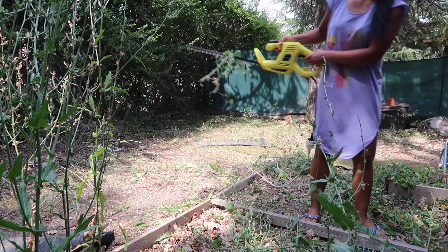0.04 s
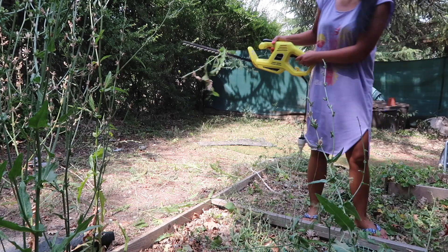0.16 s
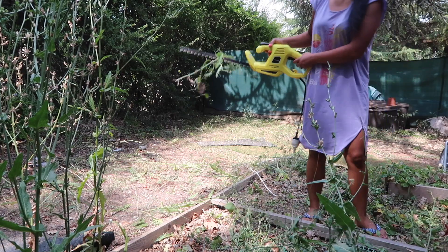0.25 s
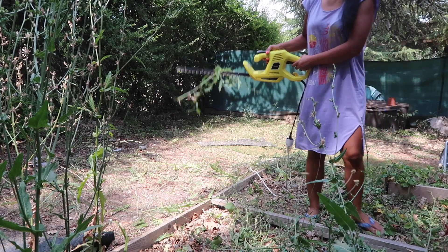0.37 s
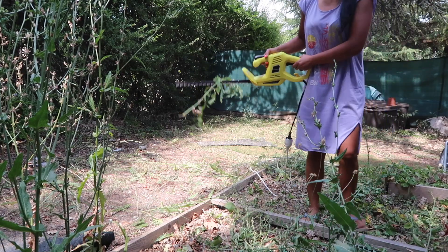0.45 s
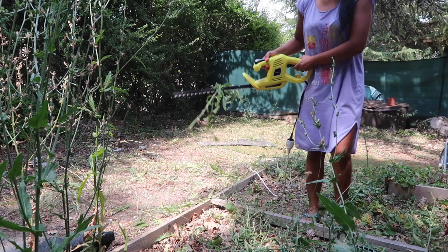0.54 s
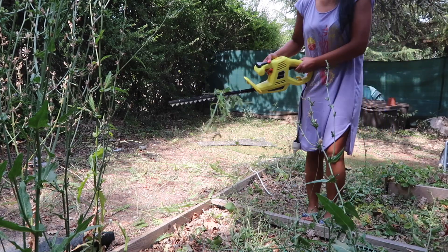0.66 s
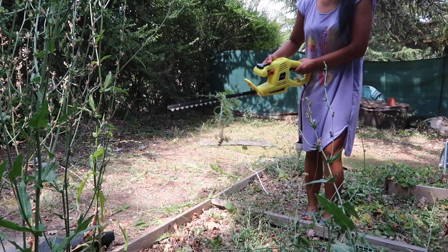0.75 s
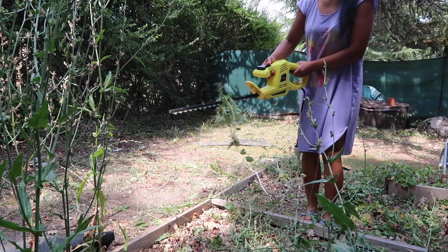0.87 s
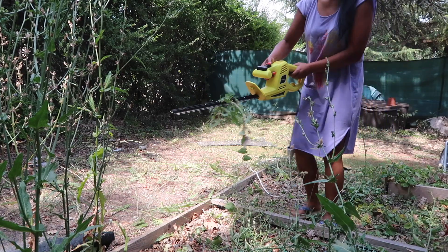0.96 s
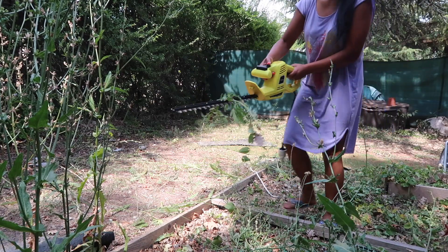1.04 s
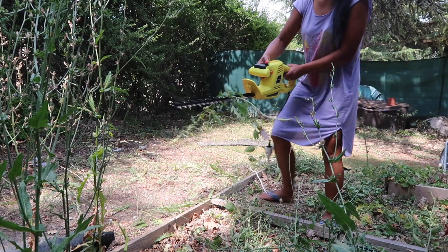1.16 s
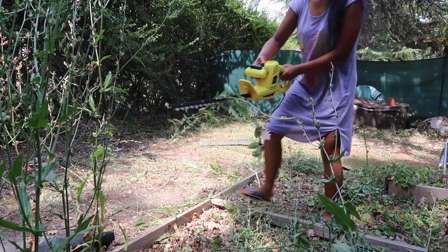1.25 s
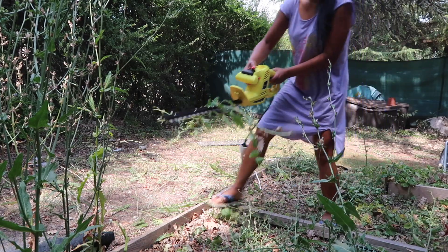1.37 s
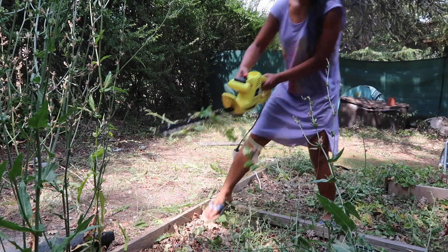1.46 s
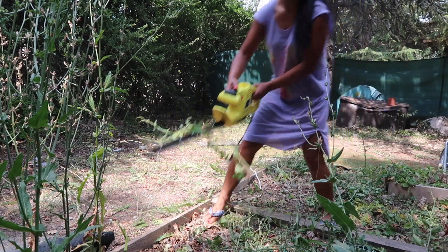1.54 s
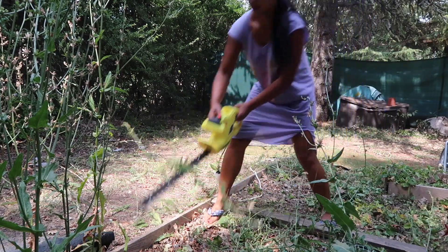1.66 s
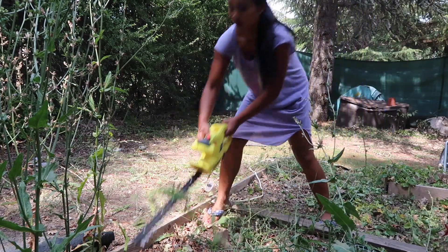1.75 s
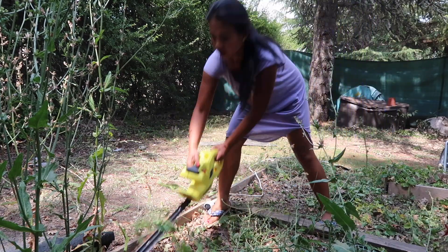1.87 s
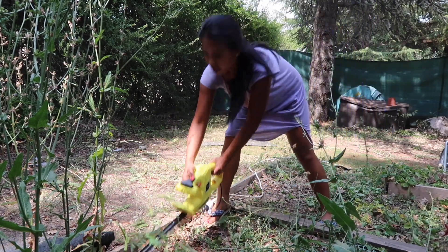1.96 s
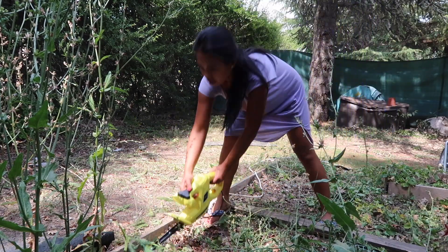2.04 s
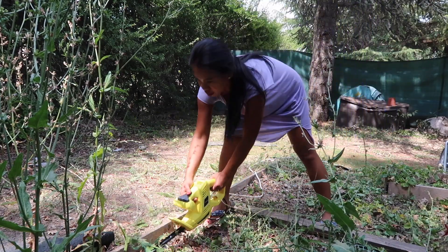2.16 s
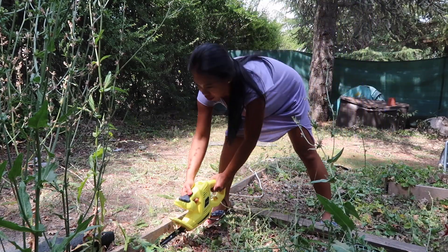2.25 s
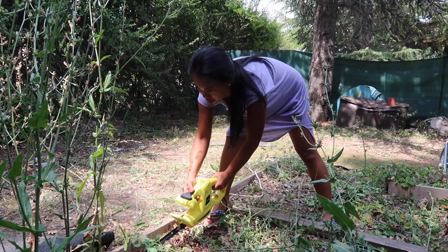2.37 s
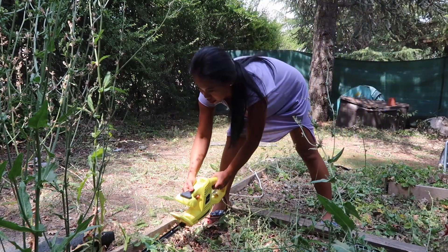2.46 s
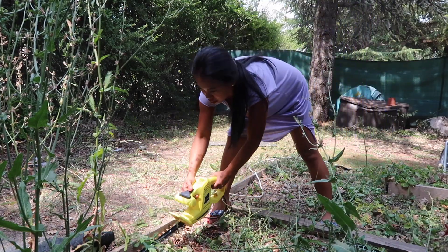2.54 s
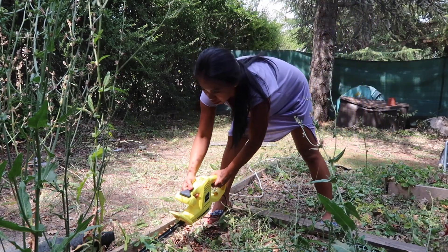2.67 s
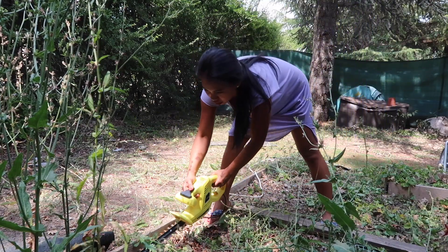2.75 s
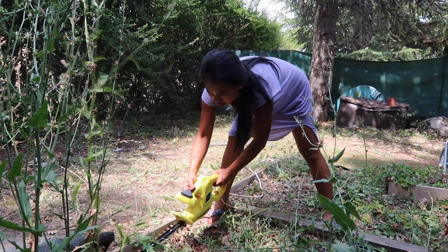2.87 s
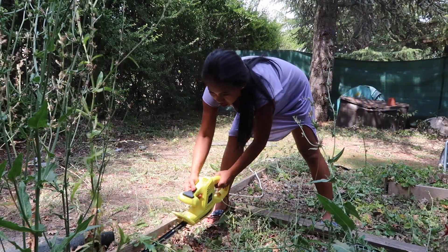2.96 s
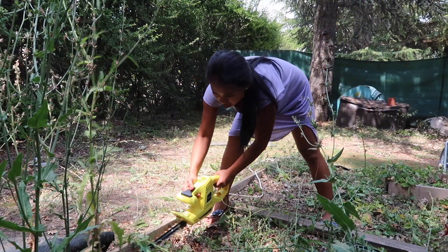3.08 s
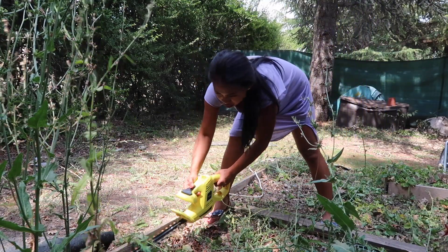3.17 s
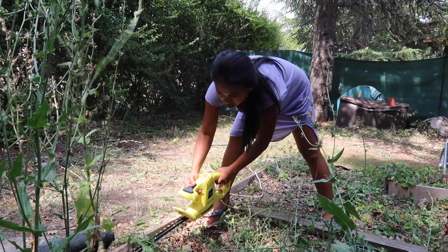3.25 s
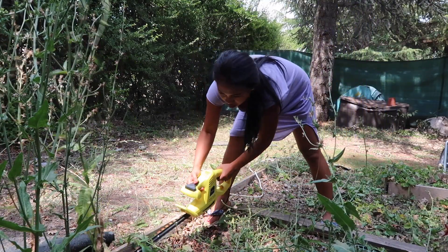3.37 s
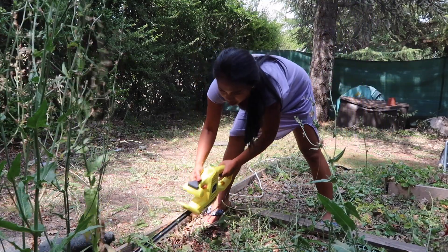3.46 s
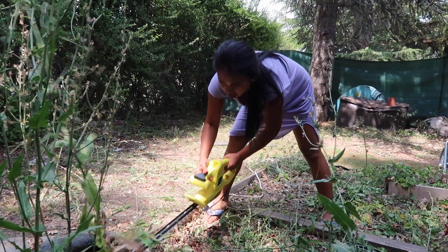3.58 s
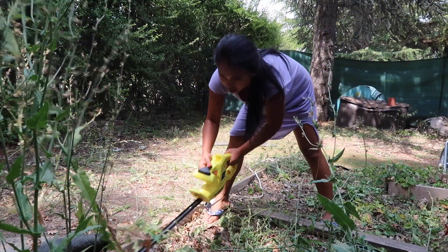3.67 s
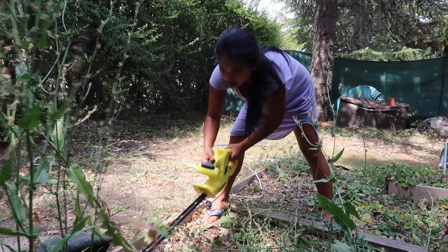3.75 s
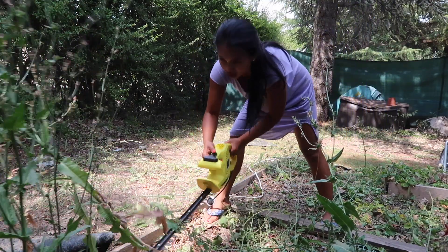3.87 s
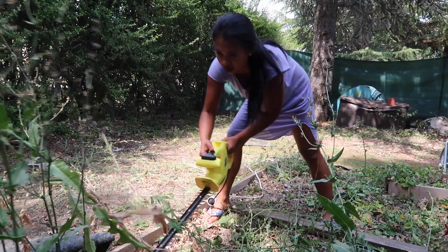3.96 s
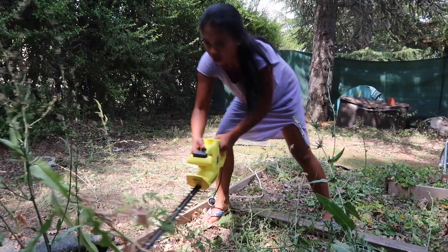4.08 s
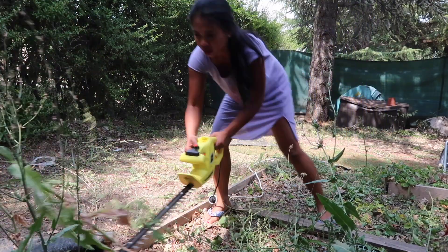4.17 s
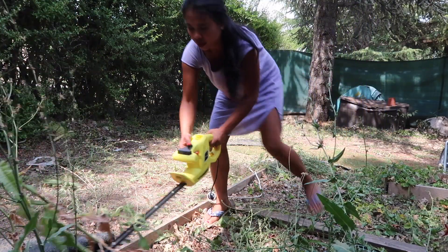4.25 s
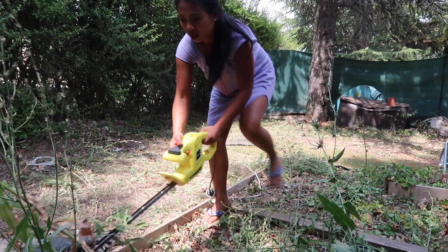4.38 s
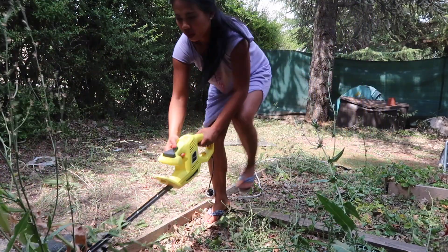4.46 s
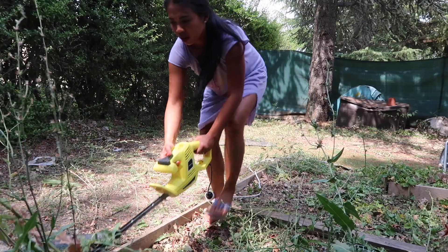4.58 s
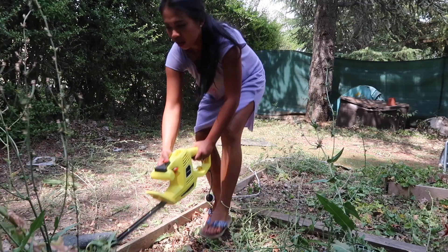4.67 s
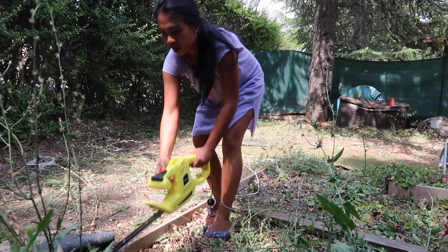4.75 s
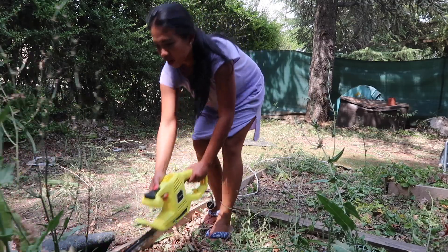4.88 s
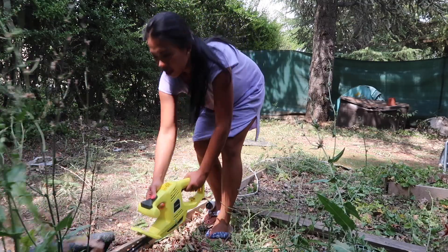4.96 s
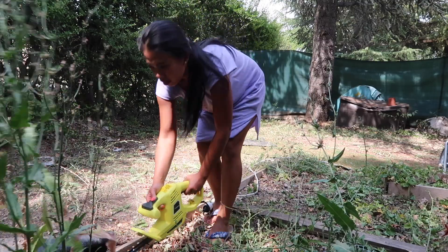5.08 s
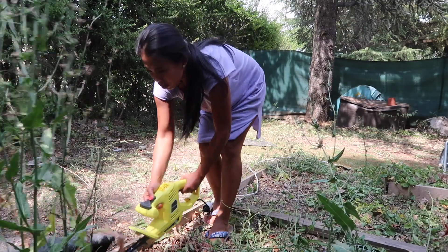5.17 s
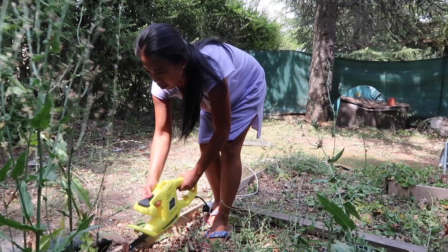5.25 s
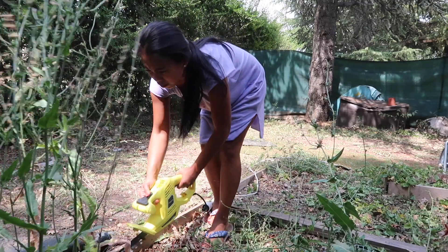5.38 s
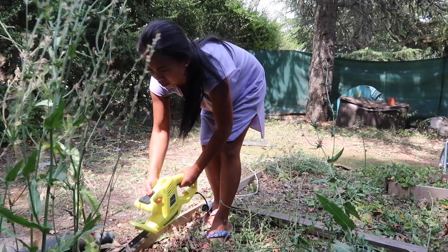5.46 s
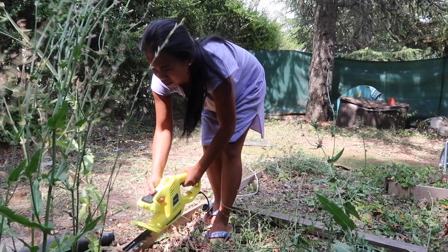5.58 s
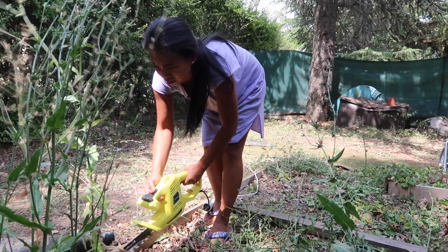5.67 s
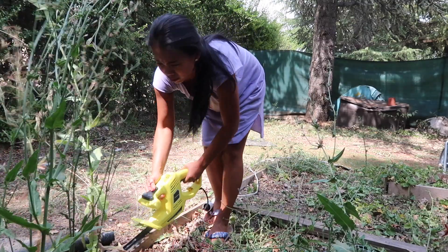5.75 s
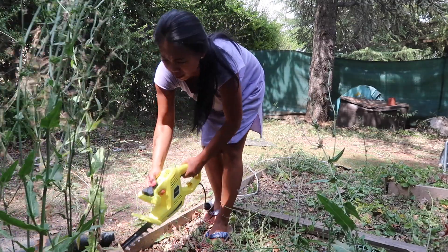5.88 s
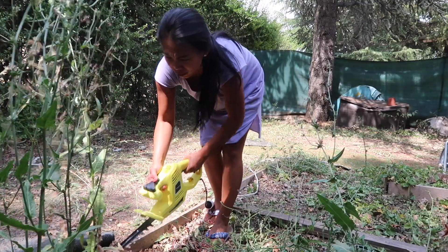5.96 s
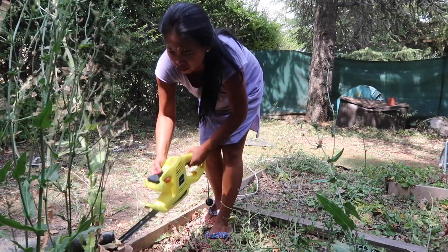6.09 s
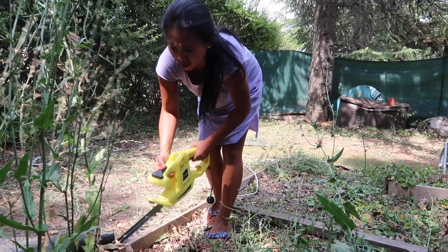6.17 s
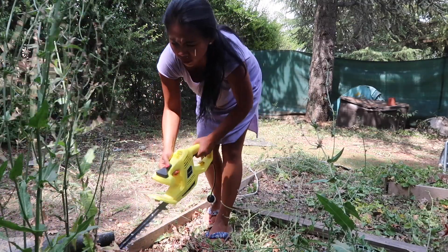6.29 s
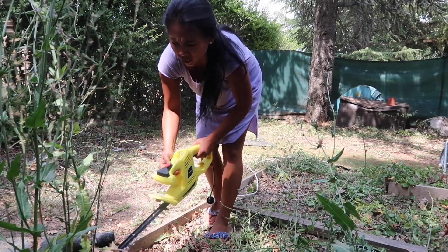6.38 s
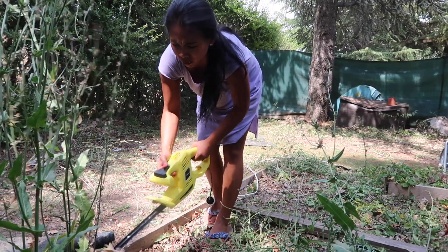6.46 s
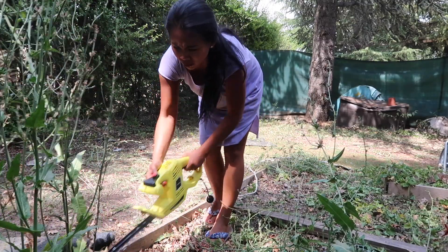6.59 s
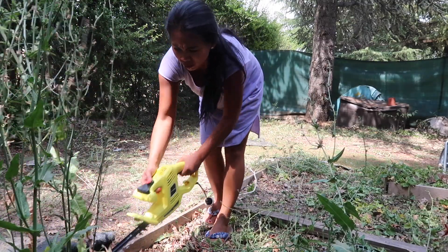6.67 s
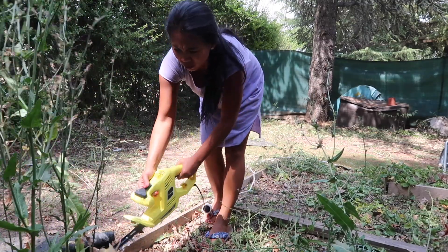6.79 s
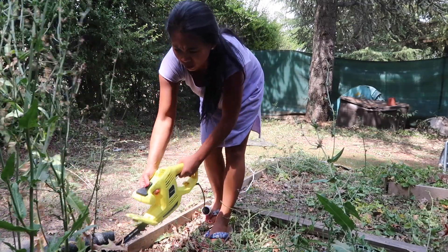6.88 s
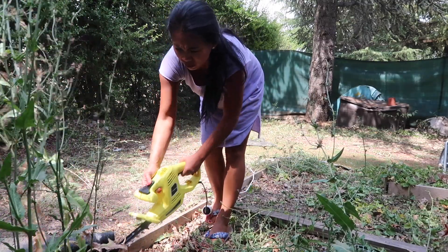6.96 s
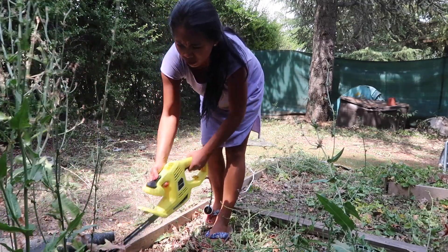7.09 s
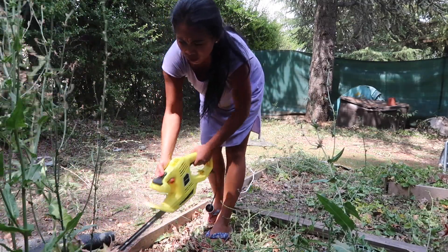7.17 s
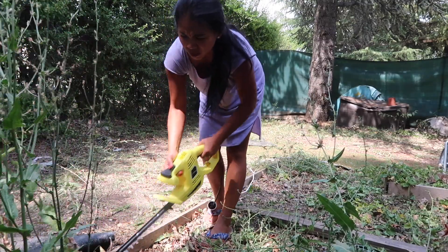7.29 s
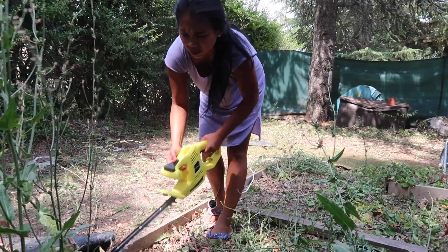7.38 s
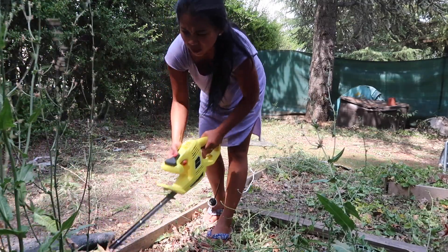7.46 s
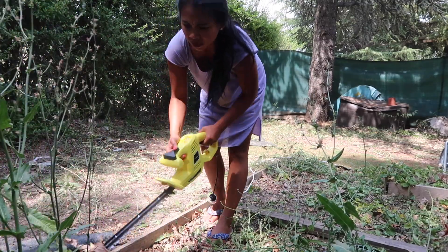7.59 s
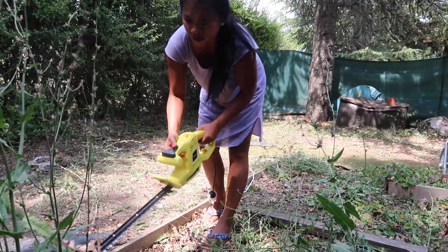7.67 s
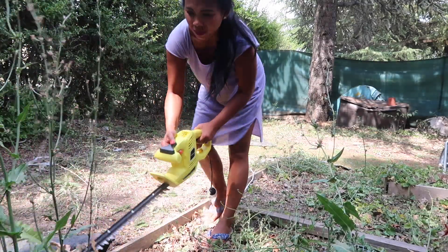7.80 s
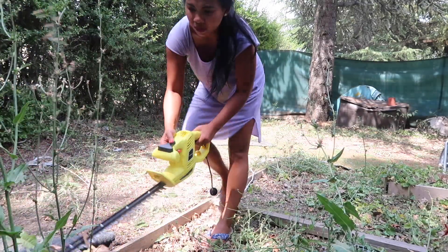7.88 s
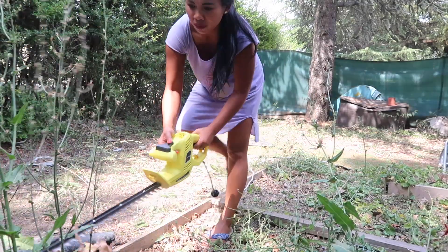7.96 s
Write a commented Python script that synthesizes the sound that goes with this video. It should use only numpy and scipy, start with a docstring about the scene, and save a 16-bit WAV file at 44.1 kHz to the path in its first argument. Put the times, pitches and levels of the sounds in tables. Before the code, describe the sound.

Close, dry pickup of an electric hedge trimmer used in short pulls: a tiny blip running into a first burst, then two more bursts well apart. Each starts with a clack, climbs into a metallic, grinding rattle with a motor whine, then slows into loose ticking. Between them are small stem snaps, leaf rustle and soft ground bumps, over a faint buzzing cicada, a few bird whistles, fading tyre noise and a low engine hum.

```python
"""A cicada chirps and a vehicle hums far off; soon dry weeds rustle and stems snap, heard close by.
Then a corded hedge trimmer bursts in, first with one brief pull of the trigger and then three longer ones.
Its rattle is knocks and scraping noise sent through resonances; its whine is tones that follow the motor's speed.
Rustles, snaps and single clacks are filtered clicks and noise, bumps are short low tones with soil noise,
bird whistles are gliding tones, and the vehicle is a hum with harmonics over low rumble and tyre noise."""
import sys
import numpy as np
from scipy import signal
from scipy.fft import rfft, irfft, next_fast_len
from scipy.io import wavfile
from scipy.ndimage import uniform_filter1d, map_coordinates

SR = 44100
rng = np.random.default_rng(int(sys.argv[2]) if len(sys.argv) > 2 else 0)


def generate_wav(signal):
    """Clip the signal to [-1, 1] and save it as 16-bit WAV at the path in sys.argv[1]."""
    frames = np.transpose(np.atleast_2d(signal))
    scaled = np.clip(frames, -1, 1) * 32767
    pcm = np.round(scaled).astype(np.int16)
    wavfile.write(sys.argv[1], SR, pcm)


N = 354123
T = np.arange(N) / SR  # time of every sample, s
TOP_HZ = 15800  # nothing sounds above this pitch


def amp(db):
    """Turn decibels into a gain."""
    return 10 ** (np.asarray(db) / 20)


def unit(x):
    """Scale a sound to rms 1."""
    return x / np.sqrt(np.mean(x ** 2) + 1e-20)


def along(points, hz):
    """Read a curve of (f/Hz, value) points, with pitch on a log axis."""
    f, v = np.transpose(points)
    return np.interp(np.log(hz + 1), np.log(f + 1), v)


def curves(rows):
    """Give one value per sample for each column after the time."""
    s, *cols = np.transpose(rows)
    return [np.interp(T, s, c) for c in cols]


def wobble(rate):
    """Draw a smooth random curve with rate knots a second."""
    knots = rng.standard_normal(int(N * rate / SR) + 4)
    return map_coordinates(knots, [T * rate])


def filtered(x, response):
    """Multiply the spectrum of x by a response, which may be complex."""
    m = next_fast_len(len(x) + 8192)
    return irfft(rfft(x, m) * response(np.fft.rfftfreq(m, 1 / SR)), m)[:len(x)]


def coloured(x, spectrum):
    """Give x a tone colour with a causal (minimum-phase) filter, so that nothing sounds early."""
    size = 4096
    cepstrum = irfft(np.log(amp(along(spectrum, np.fft.rfftfreq(size, 1 / SR)))))
    # folding the cepstrum onto positive times makes the filter causal
    cepstrum[1:size // 2] *= 2
    cepstrum[size // 2 + 1:] = 0
    return signal.fftconvolve(x, irfft(np.exp(rfft(cepstrum))))[:len(x)]


def resonances(modes, f):
    """Add up the responses of resonances, each given as (f/Hz, width/Hz, level/dB)."""
    return sum(amp(db) * 1j * f * w / (c * c - f * f + 1j * f * w) for c, w, db in modes)


def resonant(x, hz, width_hz):
    """Send x through a resonance whose pitch moves along hz."""
    carrier = np.exp(2j * np.pi * np.cumsum(hz) / SR)
    pole = np.exp(-np.pi * width_hz / SR)
    return 2 * (1 - pole) * np.real(carrier * signal.lfilter([1], [1, -pole], x / carrier))


def noise(spectrum):
    """Make coloured noise of rms 1."""
    return unit(filtered(rng.standard_normal(N), lambda f: amp(along(spectrum, f))))


def ticks(turns, scatter_db):
    """Make one impulse of random but bounded size each time turns passes a whole number."""
    passes = np.diff(np.floor(turns), prepend=np.floor(turns[0]))
    return passes * amp(scatter_db * 2 * np.tanh(rng.standard_normal(N) / 2))


def smeared(x, seconds):
    """Delay every frequency by its own random time, up to seconds, without changing its strength."""
    knots = np.linspace(0, SR / 2, num=120)
    delays = seconds * rng.random(len(knots)) ** 2

    def response(f):
        # phase is the running sum of delay over frequency
        return np.exp(-2j * np.pi * np.cumsum(np.interp(f, knots, delays)) * f[1])
    return filtered(x, response)


def add(track, s, sound):
    """Mix a short sound into a track at s seconds."""
    part = track[max(round(s * SR), 0):][:len(sound)]
    part += sound[:len(part)]


def outdoors(x, wet_db, t60):
    """Add to the direct sound its scatter from hedges, ground and fence: a fading noise tail."""
    t = np.arange(SR // 2) / SR
    tail = rng.standard_normal(len(t)) * amp(-60 * t / t60) * (1 - np.exp(-t / 0.0037))
    return x + amp(wet_db) * signal.fftconvolve(x, tail / np.linalg.norm(tail))[:N]


# moments when the rattle is louder: (t/s, half length/s, extra level/dB)
LOUD_MOMENTS = [(3.149, 0.011, 3), (3.588, 0.028, 5), (5.586, 0.0091, 2), (5.917, 0.0069, 5.5),
                (6.11, 0.033, 2), (7.105, 0.016, 2.5), (7.403, 0.0083, 3.5), (7.421, 0.0071, 2),
                (7.435, 0.0028, 5.5)]
# tones of shaft, pinion and fan:
# (multiple of the shaft speed, relative level/dB, power of speed it grows with, phase flutter/rad)
WHINE = [(1, -15, .05, .6), (4, -4, .9, .7), (5, -7, .8, .7), (7, -9, 1.5, .8), (8, -6, 1, .8),
         (9, -11, 1.3, .8), (11.5, -7, 3, .8), (12, -7, 2.5, .8), (16, -5, 2, .9), (20, 6, 3.5, .7)]
BRUSH_TICKS_PER_TURN = 40
BRUSH_HZ, BRUSH_WIDTH_HZ = 4450, 800  # resonance that favours the whine of the brushes


def trimmer(rough_db=1.5, rattle_db=-9):
    """Gears knock and blades scrape, hardest at each reversal and at the loud moments listed; the motor whines."""
    speed, level, stroke, brush = motor()
    pace = speed / speed.max()
    turns = np.cumsum(speed) / SR
    coasting = uniform_filter1d(1. * (np.gradient(speed) < 0), size=900)
    louder_db = sum(db * np.exp(-((T - s) / half) ** 2) for s, half, db in LOUD_MOMENTS)
    load = clacks(stroke) ** (pace ** 1.5) * amp(louder_db + rough_db * wobble(130))
    drive = level * load * contacts(speed, pace, turns)
    rattle = amp(rattle_db) * radiated(softened(drive, coasting, pace))
    tones = motor_tones(speed, pace, turns, coasting, brush)
    return outdoors(rattle + level * np.sqrt(load) * tones, wet_db=-11.5, t60=0.12)


def contacts(speed, pace, turns, loose_hz=130, knock_db=0.5, mesh_db=0, scrape_db=-6):
    """Loose teeth knock, the pinion strikes once a turn and steel scrapes on steel."""
    # backlash: the teeth knock unevenly, and thin out to single ticks as the motor coasts
    rate = loose_hz + 2 * speed * pace
    knocks = ticks(np.cumsum(rate * amp(3.5 * wobble(200))) / SR, scatter_db=2) * np.sqrt(SR / rate)
    # strikes once a turn give a comb of rough partials
    play = .018 * wobble(600)  # backlash of the pinion, in turns
    mesh = ticks(turns + play, scatter_db=2) * np.sqrt(pace * SR / speed.max())
    scrape = rng.standard_normal(N) * (1.3 + .2 * pace)
    # the long steel bar spreads every knock over a few milliseconds
    knocks = smeared(amp(knock_db) * knocks, seconds=.0035)
    mesh = smeared(amp(mesh_db) * mesh, seconds=.004)
    return knocks + mesh + amp(scrape_db) * scrape


def softened(drive, coasting, pace, softening=0.38):
    """Slow contacts are softer and lose part of their treble while the motor coasts."""
    treble = filtered(drive, lambda f: 1 - 1 / (1 + (f / 4200) ** 4))
    return drive - softening * coasting * (1 - pace) * treble


def motor_tones(speed, pace, turns, coasting, brush, tone_db=-2, idle_db=-1):
    """Each tone flickers, is as loud as the gearbox radiates at its pitch, and weakens with the power off."""
    tones = np.zeros(N)
    for multiple, db, power, flutter_rad in WHINE:
        flicker = amp(3.5 * wobble(70))
        gain = amp(tone_db + db + idle_db * coasting + along(GEARBOX, multiple * speed)) * pace ** power
        tones += flicker * gain * np.sin(2 * np.pi * multiple * turns + flutter_rad * wobble(150))
    # while coasting, the brushes' whine sweeps down through a resonance
    favour = np.exp(-((BRUSH_TICKS_PER_TURN * speed - BRUSH_HZ) / BRUSH_WIDTH_HZ) ** 2)
    whine = np.sin(2 * np.pi * BRUSH_TICKS_PER_TURN * turns + wobble(200) / 2)
    return tones + coasting * brush * favour * whine


# pulls of the trigger: (pressed t/s, released t/s, t/s of one blade reversal, rise of the rattle/s,
# relative rattle level/dB, starting jolt/dB, fade while coasting/dB per s,
# free speed of the shaft f/Hz, spin-up time/s, relative level/dB of the brushes' whine)
PULLS = [(2.78, 2.88, 2.878, 0.053, -17, 1, 129, 441, .147, -25),
         (2.9986, 3.439, 3.291, 0.075, -15, 0, 81, 475, .192, -27),
         (5.408, 5.815, 5.6825, 0.042, -16, 3, 66, 469.3, .178, -25),
         (6.924, 7.3, 7.203, 0.04, -16.5, 2.5, 54, 451.3, .164, -5)]
TURNS_PER_REVERSAL = 15.3  # shaft turns from one blade reversal to the next
SPIN_UP_SHAPE, COAST_S = 0.82, 0.385  # bend of the run-up; time from free speed to rest
SLACK_DB, JOLT_S = 14, 0.0091  # how far down the rattle starts, length of the jolt as the gears take up


def motor():
    """Each pull spins the shaft up towards its free speed, then friction brings it to rest."""
    speed, level, stroke, brush = np.zeros((4, N))
    for on, off, reversal, rise_s, db, jolt_db, fade_db, free_hz, spin_up_s, brush_db in PULLS:
        powered = np.clip(T - on, 0, off - on)
        coasted = np.maximum(T - off, 0)
        reached = 1 - np.exp(-(powered / spin_up_s) ** SPIN_UP_SHAPE)
        hz = free_hz * np.maximum(np.sqrt(reached) - coasted / COAST_S, 0) ** 2
        jolt = jolt_db * np.exp(-((T - on - rise_s) / JOLT_S) ** 2)
        take_up = jolt - SLACK_DB * np.maximum(1 - powered / rise_s, 0)
        level = np.maximum(level, amp(db + take_up - fade_db * coasted) * np.tanh(hz / 4))
        turns = np.cumsum(hz) / SR
        strokes = (turns - np.interp(reversal, T, turns)) / TURNS_PER_REVERSAL
        stroke = np.where(T > on, strokes, stroke)
        brush = np.where(T > on, amp(brush_db), brush)
        speed = np.maximum(speed, hz)
    return speed, level, stroke, brush


CLACK_WIDTH, REBOUND_AT, REBOUND_WIDTH = 0.2, 0.47, 0.21  # in shares of one blade stroke
REBOUND_DB, GLIDE_DB = -4.5, -9.5  # the rebound and the quiet glide between, against the clack


def clacks(stroke):
    """The load peaks with a clack at the reversal and a weaker rebound, with a quiet glide between."""
    def hump(at, width):
        return np.exp(-(((stroke - at + .5) % 1 - .5) / width) ** 4)
    return amp(GLIDE_DB) + hump(0, CLACK_WIDTH) + amp(REBOUND_DB) * hump(REBOUND_AT, REBOUND_WIDTH)


# tone colour of the gearbox and cutter bar: (f/Hz, level/dB per Hz)
GEARBOX = [(40, -41.5), (130, -14), (330, -16.5), (520, -15.5), (1000, -9), (1500, -5), (2100, -2.5),
           (2700, -0.5), (3300, -7.5), (4300, -12.5), (5400, -23.5), (7500, -24.5), (12000, -32),
           (16000, -45)]
# resonances of the housing: (f/Hz, width/Hz, level/dB above the rest)
HOUSING = [(1440, 200, -4), (2550, 94, -3), (3285, 200, 5), (6430, 350, -0.5)]
# a ringing band whose pitch and level shift during each burst, over a low boom:
# (t/s, ring f/Hz, ring level/dB, low boom level/dB)
RING_AND_BOOM = [(2.8, 2360, -14, 7), (3.1, 2400, 3, 5), (3.3, 2280, -7, -10), (3.38, 1950, -14, 3),
                 (3.5, 2000, 0.5, -16), (3.62, 2060, 6.5, 12), (3.75, 2504, -8, -1), (5.42, 2603, 4, 3),
                 (5.485, 2600, 7, 18), (5.54, 2550, -2, -11), (5.66, 2846, -2, -4), (5.79, 3130, 1, -3),
                 (5.88, 2800, -2, 2), (6.05, 2620, 0, 9), (6.95, 2522, 2, 9), (7.14, 2540, 7, 4),
                 (7.3, 2809, -10, -1), (7.41, 2580, -3, 12.5), (7.55, 2620, -1, 8)]
RING_WIDTH_HZ, BOOM_HZ, BOOM_WIDTH_HZ = 220, 623, 65


def radiated(drive, drift=0.045, swing_db=3.5):
    """The drive excites the gearbox colour and added resonances that waver in pitch and level."""
    click = coloured(signal.unit_impulse(SR // 2), GEARBOX)
    body = coloured(drive, GEARBOX) / np.linalg.norm(click)
    ring_hz, ring_db, boom_db = curves(RING_AND_BOOM)
    modes = HOUSING + [(ring_hz, RING_WIDTH_HZ, ring_db), (BOOM_HZ, BOOM_WIDTH_HZ, boom_db)]
    ringing = np.zeros(N)
    for hz, width_hz, db in modes:
        swell = amp(db + swing_db * wobble(25))
        ringing += swell * resonant(body, hz * (1 + drift * wobble(20)), width_hz)
    return body + ringing


# stems snapping, and sharp single clacks during the trimmer's bursts:
# (t/s, relative level/dB, woody knock against it level/dB, crack f/Hz, time to fall 60 dB/s)
SNAPS = [(0.717, -22, -5, 2880, 0.077), (0.728, -24, -3, 2450, 0.049), (0.869, -34, -19, 3700, .025),
         (0.897, -23, -14, 2200, 0.023), (0.9303, -28, -14, 2900, .05), (0.968, -25.5, -9, 2800, 0.082),
         (1.243, -26, -4, 2600, .025), (1.545, -21, -28, 3206, 0.09), (1.558, -14.5, -22, 2980, 0.1),
         (1.586, -19.5, -12, 3500, 0.1), (1.6739, -21.5, -8, 2790, 0.051), (2.0947, -14, -17, 2896, 0.046),
         (2.188, -12.5, -7, 2380, 0.037), (2.5665, -23, -19, 2400, .04), (2.7758, -18, -25, 2994, 0.05),
         (2.796, -14.5, -2.5, 2300, 0.048), (2.877, 1, -25, 2490, 0.084), (3.0422, -8.5, -7.5, 2500, 0.057),
         (3.064, -5, -20.5, 3000, 0.082), (3.488, -10, -24, 2000, .06), (3.626, -11, -13, 1880, 0.038),
         (3.831, -31, -21, 3500, .015), (4.653, -29, -19, 2796, .02), (4.801, -21, -24, 3000, .04),
         (4.8544, -18.5, -4.5, 2618, 0.035), (4.87, -15, -25, 3980, 0.068), (4.9505, -18, -20, 2500, 0.029),
         (5.013, -19.5, -5, 1580, 0.061), (5.0633, -17.5, -5, 2000, 0.053), (5.225, -27, -24, 2514, .025),
         (5.3631, -19, -21, 2804, 0.03), (5.4032, -21, -6, 2497, 0.032), (5.426, -3.5, -26, 2500, 0.13),
         (5.5298, -2.5, -37, 2637, 0.055), (6.4687, -17, 0.5, 2500, 0.034), (6.516, -21, -22, 2500, 0.014),
         (6.5977, -24, -26, 3133, .03), (6.6594, -20.5, -13, 2710, .04), (6.6762, -21, -21, 2550, 0.05),
         (6.7245, -17, -8.5, 3100, 0.023), (6.8133, -21, -15, 2473, 0.055),
         (6.8292, -17.5, -1, 2398, 0.054), (6.904, -20, -7, 2800, .025), (6.925, -18, -18, 2630, .025),
         (7.152, -2, -25, 2590, .012), (7.162, -8, -20, 2600, .012)]
# tone colour of the bright crack: (f/Hz, level/dB per Hz)
STEM = [(200, -23), (900, -2), (2500, 3.5), (3600, 1), (5500, -26), (10000, -34), (16000, -43)]
# tone colour of the woody knock: (f/Hz, level/dB per Hz)
WOOD = [(100, -33), (300, -1), (550, 3.5), (1200, 4.5), (2500, -18), (6000, -30)]
FIBRES_PER_S = 2000  # how fast the fibres of a snapping stem give way


def snaps(crack_db=-11.0, knock_db=-9.0, ring_db=5, ring_width_hz=600):
    """A stem breaks in a run of bright fibre cracks with a woody knock; single clacks are made alike."""
    out = np.zeros(N)
    t = np.arange(SR // 8) / SR
    for s, db, wood_db, hz, t60 in SNAPS:
        fall = amp(-60 * t / t60)
        breaks = (rng.random(len(t)) < FIBRES_PER_S / SR) | (t == 0)
        fibres = breaks * rng.choice([-1, 1], len(t)) * fall
        crack = coloured(smeared(fibres, seconds=0.00203), STEM)
        crack = filtered(crack, lambda f: 1 + resonances([(hz, ring_width_hz, ring_db)], f))
        crack = unit(crack) * np.sqrt(np.mean(fall ** 2))
        knock = fall * unit(coloured(rng.standard_normal(len(t)), WOOD))
        add(out, s, amp(db) * (amp(crack_db) * crack + amp(wood_db + knock_db) * knock))
    return outdoors(out, wet_db=-7.5, t60=0.15)


# stalks dragged by the bar or trodden on: (t/s, length/s, relative level/dB)
SWISHES = [(0.694, 0.048, -49.5), (0.763, 0.21, -54.5), (1.526, 0.056, -38.5), (1.645, 0.078, -49),
           (2.072, 0.019, -39.5), (2.321, 0.047, -49.5), (2.441, .045, -49), (2.539, 0.021, -48),
           (3.733, 0.084, -52.5), (4.104, 0.18, -55), (4.775, 0.08, -42), (4.933, 0.066, -40.5),
           (5.073, 0.032, -45.5), (5.17, 0.25, -52), (6.499, 0.14, -52.5), (6.61, 0.13, -50),
           (6.773, 0.036, -43.5), (6.874, 0.04, -41.5), (7.58, 0.14, -48), (7.776, 0.14, -50.5)]
# tone colour of brushing leaves: (f/Hz, level/dB per Hz)
LEAVES = [(100, -34), (400, -6.5), (1000, -8), (2000, -2.5), (2900, 0.5), (4200, -6), (5500, -8.5),
          (8000, -9), (11000, -13), (16000, -33)]
SWISH_ATTACK_S, SWISH_FALL_DB_PER_S = 0.021, 181
STIR_DB, STIR_SWING_DB = -62, -2  # leaves stirring between the swishes


def rustle(level_db=5.5, grain_db=4, crackle_db=4):
    """Leaves brush and dry stalks crackle in clumps: each swish swells, holds and dies away."""
    level = amp(STIR_DB + STIR_SWING_DB * wobble(3.58))
    for s, length, db in SWISHES:
        swell = np.clip((T - s) / SWISH_ATTACK_S, 0, 1)
        fall_db = SWISH_FALL_DB_PER_S * np.maximum(T - s - length, 0)
        level = np.maximum(level, swell * amp(db - fall_db))
    # irregular grains of either sign, about 2000 a second
    grains = ticks(np.cumsum(rng.random(N)) * 4000 / SR, grain_db) * rng.choice([-1, 1], N)
    leaves = unit(coloured(grains * amp(0.89 * wobble(90)), LEAVES))
    return level * (amp(level_db) * leaves + amp(crackle_db) * crackle())


def crackle(pitch_hz=2900, spread=0.29, cycles=5, size_db=3.5, count=3500):
    """Dry fibres give way one by one, each with a tiny ring of its own pitch."""
    when, size = rng.random((2, count))
    hz = np.minimum(pitch_hz * np.exp(spread * rng.standard_normal((count, 1))), TOP_HZ)
    n = np.arange(SR // 150)
    loudness = amp(-size_db * np.log(0.014 + size))[:, None]
    fall = amp(-20 * hz * n / SR / cycles)  # 20 dB in the given number of cycles
    grains = loudness * np.sin(2 * np.pi * hz * n / SR) * fall
    places = (when * N).astype(int)[:, None] + n
    return unit(np.bincount(places.ravel(), grains.ravel(), N)[:N])


# the bar bumps the ground and the timber edging: (t/s, relative level/dB, f/Hz, time to fall 60 dB/s)
BUMPS = [(3.234, -17, 112, 0.044), (5.573, -22.5, 119, 0.082), (5.588, -20, 129.3, 0.062),
         (6.903, -11, 186, 0.069), (7.052, -20, 156, 0.079), (7.09, -28.5, 91.8, 0.1),
         (7.154, -29, 186, 0.075), (7.212, -13, 305, 0.013)]


def bumps(level_db=-2, thud_db=-8):
    """A dull, quickly damped push, a low tone, comes with a puff of soil noise."""
    soil = [(50, -52), (150, -4.0), (450, -3), (1200, -19.0), (5000, -57)]  # (f/Hz, level/dB per Hz)
    out = np.zeros(N)
    t = np.arange(SR // 5) / SR
    for s, db, hz, t60 in BUMPS:
        thud = unit(coloured(rng.standard_normal(len(t)), soil))
        fall = amp(db + level_db - 60 * t / t60)
        add(out, s, fall * (np.sin(2 * np.pi * hz * t) + amp(thud_db) * thud))
    return out


# cicada chirps: (t/s, chirps so far)
CHIRPS = [(0, 0), (1.18, 6), (2.09, 11), (4.8, 25), (5.35, 28), (6.16, 32), (8.09, 42)]
# loudness of the cicada: (t/s, relative level/dB)
CICADA = [(0, -54.5), (0.45, -48.5), (0.8, -49), (1.2, -48.5), (1.9, -42.5), (2.7, -44), (4, -51),
          (5.1, -42.5), (6.1, -56), (6.6, -46), (8.03, -50)]
# resonances of its tymbal, the buckling sound plate: (f/Hz, width/Hz, level/dB)
TYMBAL = [(4200, 300, -15), (4560, 380, 0), (4990, 280, -8)]


def insects(duty=0.51, click_hz=115, pause_db=-14):
    """A cicada's tymbal buckles in a grainy buzz that swells in even chirps, softened by the trees."""
    chirps = curves(CHIRPS)[0]
    singing = amp(pause_db) + uniform_filter1d(1. * (chirps % 1 < duty), size=900)
    clicks = np.cumsum(click_hz * (1 + .25 * wobble(60))) / SR
    buckle = np.exp(-5 * (clicks % 1))

    def tymbal(f):
        # squaring narrows each resonance; the gain undoes the doubled level
        return sum(resonances([mode], f) ** 2 * amp(-mode[2]) for mode in TYMBAL)
    song = filtered(singing * buckle * rng.standard_normal(N), tymbal)
    return amp(curves(CICADA)[0] - 3.5) * unit(outdoors(song, wet_db=-6, t60=0.3))


# bird whistles: (t/s, length/s, start f/Hz, end f/Hz, relative level/dB, rasp as a share of the pitch)
WHISTLES = [(3.972, 0.1, 3350, 3650, -47, .006), (4.16, 0.06, 2660, 2960, -50, .02),
            (4.562, 0.05, 3370, 3430, -42, .005), (4.6, .034, 3570, 3580, -39, .005),
            (4.235, .04, 3150, 3080, -51, .03), (4.306, .065, 3770, 3965, -47, .008),
            (4.365, 0.035, 3050, 2700, -52, .03), (4.44, 0.06, 3950, 3980, -57, .008)]
WHISTLE_EDGE_S = 0.012  # fade in and out


def bird(flutter_db=2):
    """Short whistles, some pure and some raspy, glide between pitches and linger among the trees."""
    out = np.zeros(N)
    for s, length, start_hz, end_hz, db, rasp in WHISTLES:
        t = np.arange(round(length * SR)) / SR
        glide = start_hz + (end_hz - start_hz) * np.sin(np.pi / 2 * t / length) ** 2
        pitch = glide * (1 + rasp * wobble(255)[:len(t)])
        edges = np.clip(np.minimum(t, length - t) / WHISTLE_EDGE_S, 0, 1)
        flutter = amp(db + flutter_db * wobble(35)[:len(t)])
        add(out, s, edges * flutter * np.sin(2 * np.pi * np.cumsum(pitch) / SR))
    return outdoors(out, wet_db=3.0, t60=1.0)


# the distant engine: (t/s, firing f/Hz, relative hum level/dB, relative second harmonic level/dB)
ENGINE = [(0.0, 31.96, -51, -38.5), (0.47, 39.88, -46, -42), (1.12, 41.33, -44, -47),
          (1.43, 45.25, -40, -40), (2.55, 54.2, -35.5, -49), (2.84, 56.1, -35.5, -45.5),
          (3.15, 53.3, -35, -56), (3.26, 53.7, -40, -48), (3.6, 56.6, -45, -57), (3.84, 61.37, -44.5, -54),
          (5.39, 60.53, -45.5, -50.5), (5.66, 65.77, -63, -49), (5.95, 62.84, -57, -59),
          (6.86, 64.26, -38.5, -47), (7.09, 62.76, -51, -52), (7.4, 64.95, -47, -68),
          (7.85, 70.6, -51.5, -49), (8.03, 70, -46, -66)]
# loudness of the low rumble: (t/s, relative level/dB)
ROAD = [(0, -36), (1.5, -44), (3.2, -41), (3.6, -48), (4.6, -41.5), (5.6, -49), (6.4, -49.5), (6.8, -37.5),
        (7.2, -63.5), (8.03, -41.5)]
# loudness of the tyres: (t/s, level/dB)
TYRES = [(0, -34.5), (0.6, -37), (1.4, -38), (2.6, -41.5), (4, -48), (5.2, -46), (6.3, -49.5), (8.03, -53)]
# tone colour of the low rumble: (f/Hz, level/dB per Hz)
RUMBLE = [(10, -35), (25, -23), (42, 4.5), (80, 4), (120, -5.5), (190, -3.5), (300, -13), (600, -45.5)]
# tone colour of the tyres: (f/Hz, level/dB per Hz)
ROAR = [(60, 1.5), (170, 5.5), (350, -0.5), (1000, 0.5), (1600, -4), (2200, -10), (4000, -31), (8000, -64),
        (16000, -70)]


def vehicle(hum_db=-0.5, second_db=0.0, third_db=-51, rumble_db=-1.5):
    """Exhaust hum climbs in pitch over low rumble, while tyre roar fades down a far road."""
    hz, first, second = curves(ENGINE)
    phase = 2 * np.pi * np.cumsum(hz) / SR
    # the pipe rings with the third harmonic near one speed
    third = third_db - np.minimum(4.0 * np.abs(hz - 61.5), 12)
    hum = np.zeros(N)
    for harmonic, db in enumerate([first + hum_db, second + second_db, third], 1):
        gain = np.sqrt(2) * amp(db + 0.67 * wobble(8.7))
        hum += gain * np.sin(harmonic * phase + 0.15 * wobble(5.4))
    rumble = amp(curves(ROAD)[0] + rumble_db + wobble(15)) * noise(RUMBLE)
    tyres = amp(curves(TYRES)[0] + 1.4 * wobble(5.05)) * noise(ROAR)
    return hum + rumble + tyres


# tone colour of the faint hiss: (f/Hz, level/dB per Hz)
AIR = [(300, 1.5), (1500, 1.5), (3000, 0.5), (4500, -3), (5600, -5.5), (8000, -13), (12000, -19.5),
       (16000, -56)]


def hiss():
    """Faint steady noise lies under everything and drifts a little in level."""
    return amp(-50.5 + 2.1 * wobble(1.535)) * noise(AIR)


def placed(x, width):
    """Left and right share a mid signal; a smeared side signal sets them apart where width is high."""
    def angle(f):
        return np.arctan(amp(along(width, f)))
    mid = filtered(x, lambda f: np.cos(angle(f)))
    side = filtered(smeared(x, seconds=.025), lambda f: np.sin(angle(f)))
    return np.array([mid + side, mid - side])


# stereo width of trimmer, snaps, rustle and bumps: nearly centred below 3.5 kHz, wide above:
# (f/Hz, side minus mid level/dB)
TRIMMER_AND_WEEDS_WIDTH = [(60, -67), (180, -44), (350, -21), (900, -66), (3000, -81), (3900, -16),
                           (4600, -3.5), (6200, -5.5), (8000, 2), (9000, 8.5), (10000, 45), (11500, 8.5),
                           (14500, 3)]
# stereo width of cicada, bird, vehicle and hiss: (f/Hz, side minus mid level/dB)
BACKGROUND_WIDTH = [(60, -63), (180, -25), (350, -11.5), (1000, -17.5), (2200, -21), (3300, -9.5),
                    (4600, 0), (6200, 1.5), (8000, 9), (9000, 13.5), (10000, 10), (11500, 13), (14500, 18)]


def scene():
    """Trimmer and weeds share one stereo width; cicada, bird, vehicle and hiss share another."""
    near = trimmer() + snaps() + rustle() + bumps()
    far = insects() + bird() + vehicle() + hiss()
    return placed(near, TRIMMER_AND_WEEDS_WIDTH) + placed(far, BACKGROUND_WIDTH)


def record(dry):
    """Remove everything above the band limit from both channels."""
    return np.array([filtered(channel, lambda f: f < TOP_HZ) for channel in dry])


dry = scene()
out = record(dry)
generate_wav(out)
```